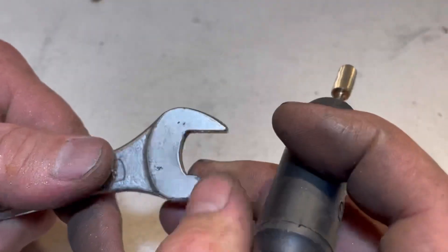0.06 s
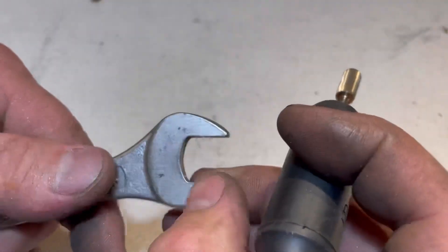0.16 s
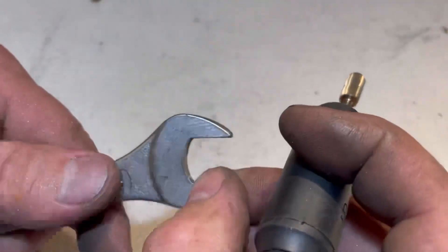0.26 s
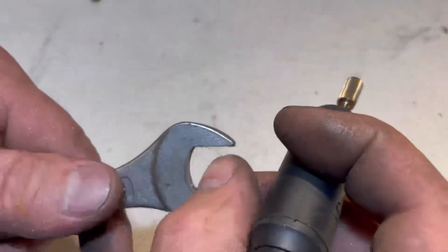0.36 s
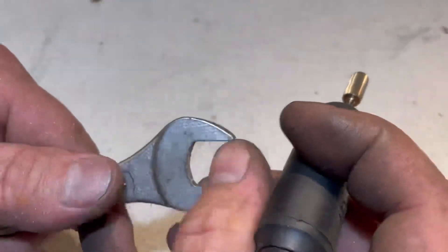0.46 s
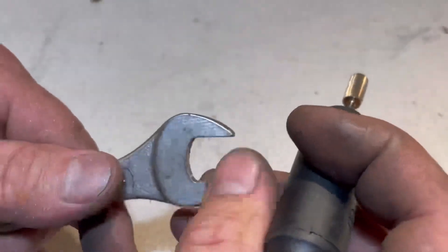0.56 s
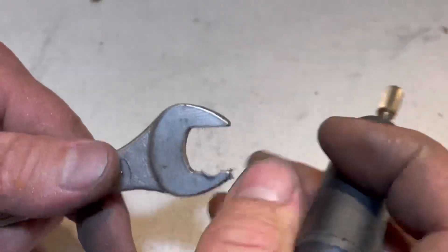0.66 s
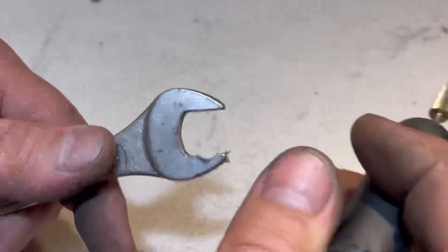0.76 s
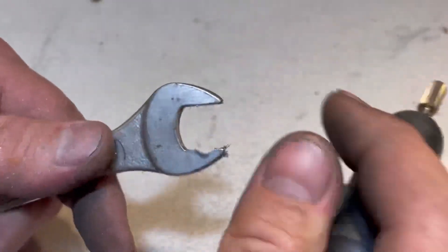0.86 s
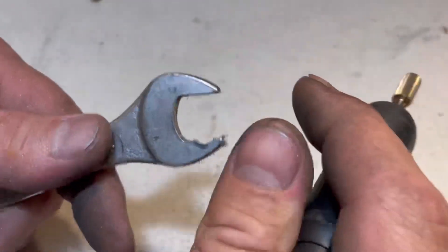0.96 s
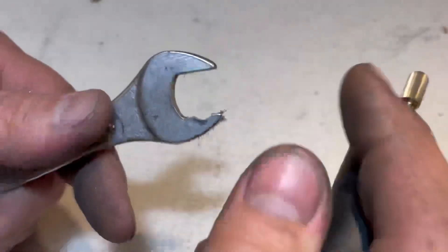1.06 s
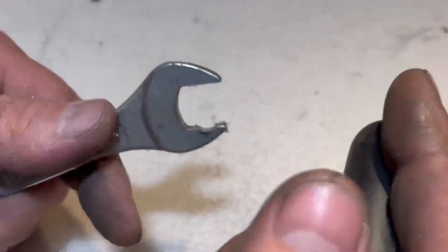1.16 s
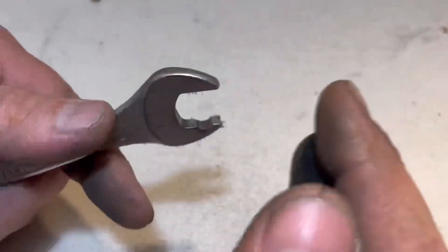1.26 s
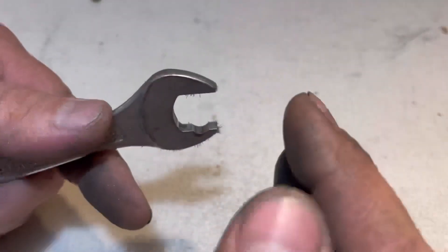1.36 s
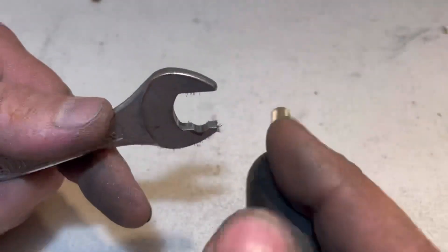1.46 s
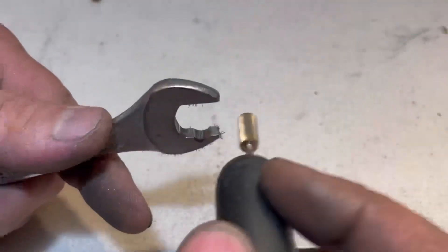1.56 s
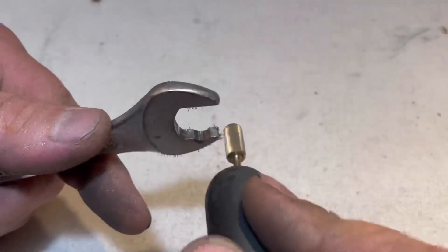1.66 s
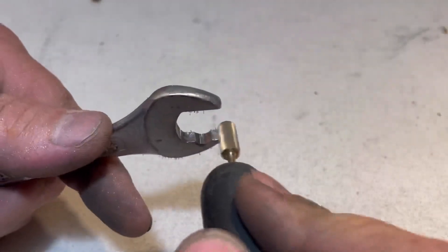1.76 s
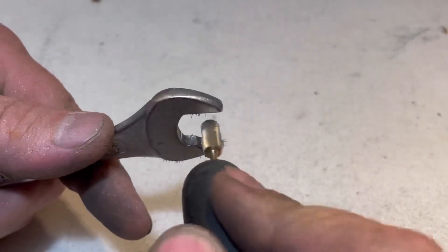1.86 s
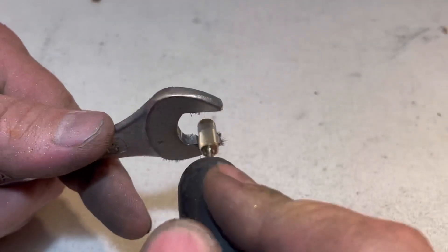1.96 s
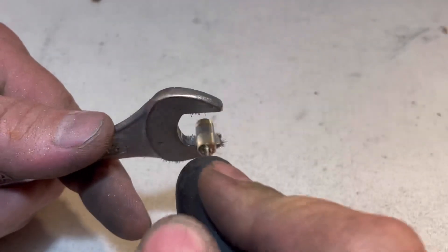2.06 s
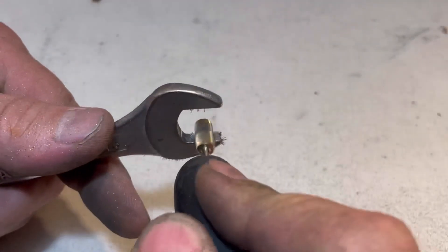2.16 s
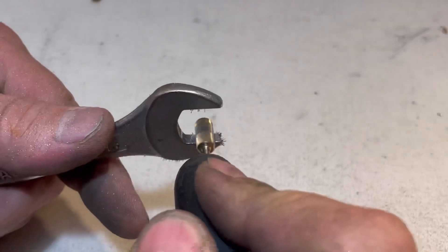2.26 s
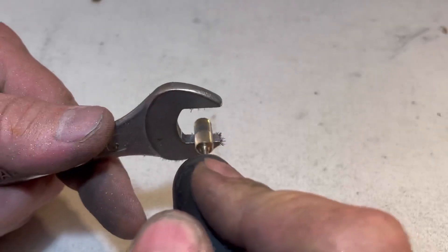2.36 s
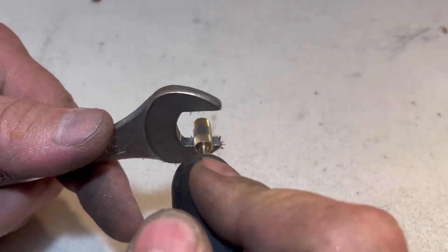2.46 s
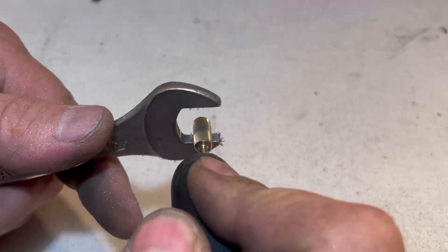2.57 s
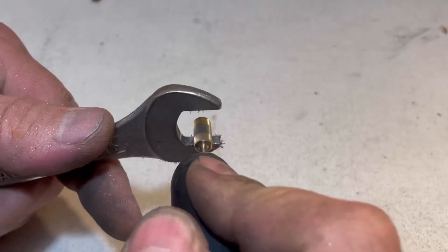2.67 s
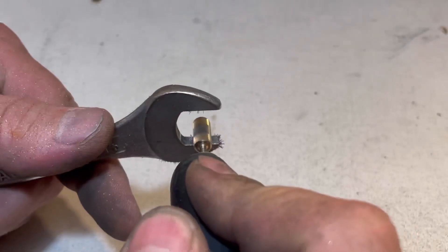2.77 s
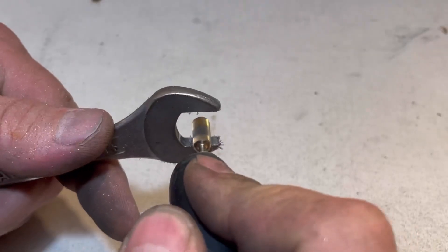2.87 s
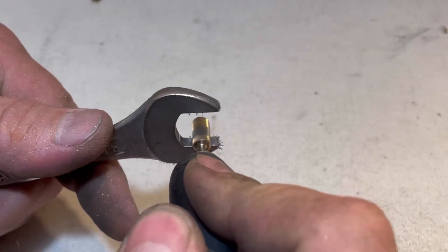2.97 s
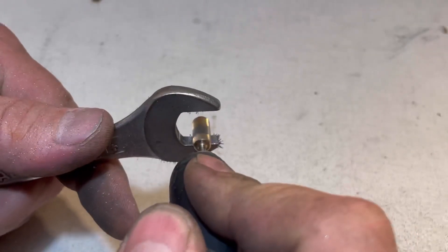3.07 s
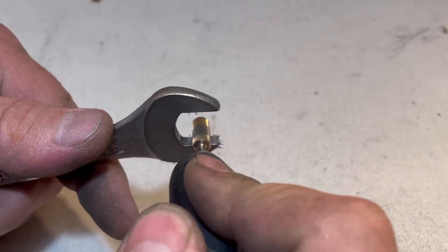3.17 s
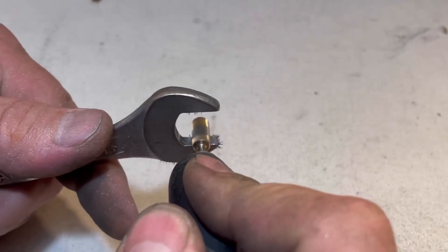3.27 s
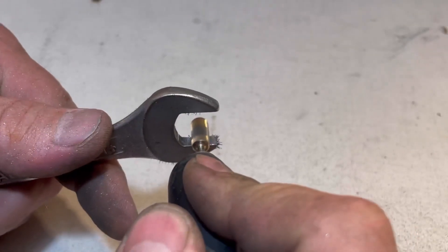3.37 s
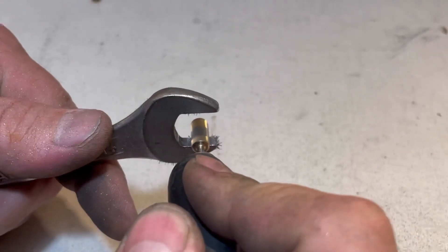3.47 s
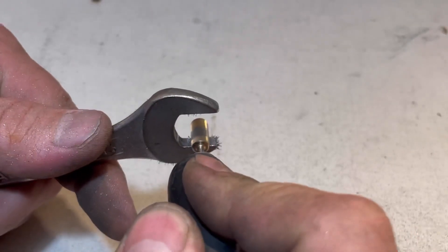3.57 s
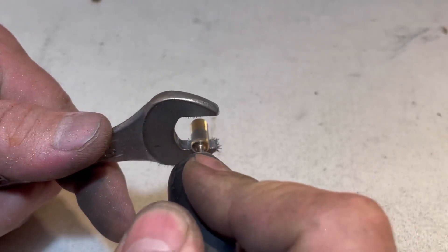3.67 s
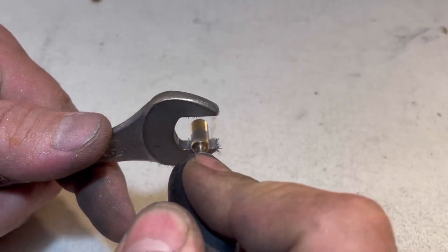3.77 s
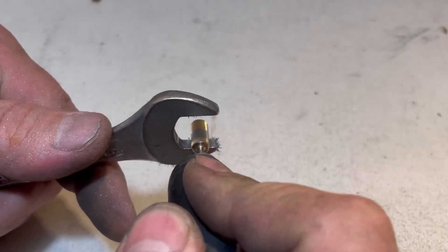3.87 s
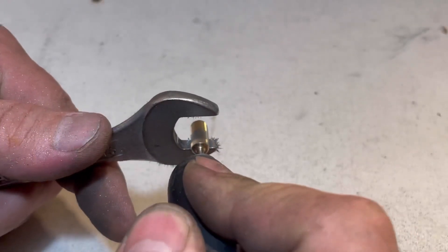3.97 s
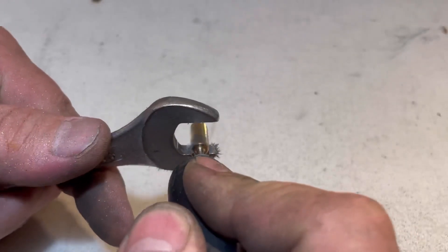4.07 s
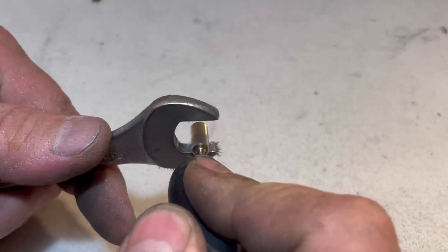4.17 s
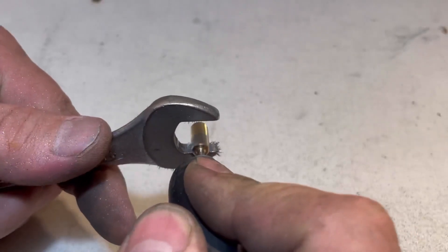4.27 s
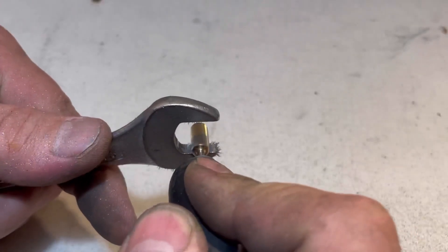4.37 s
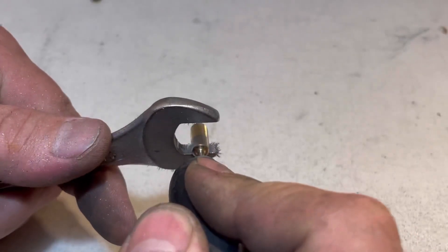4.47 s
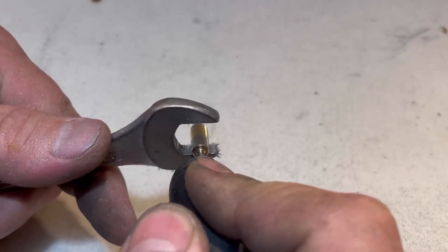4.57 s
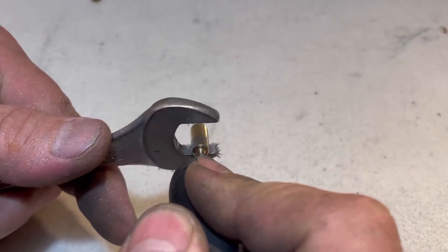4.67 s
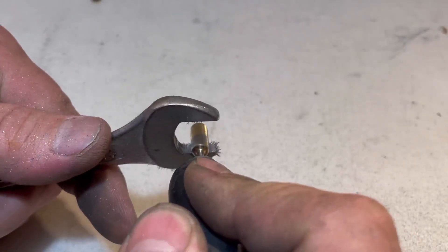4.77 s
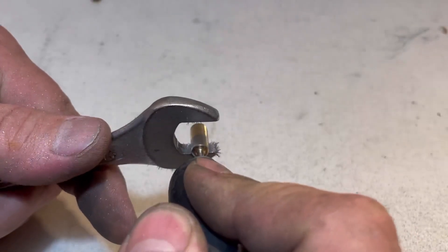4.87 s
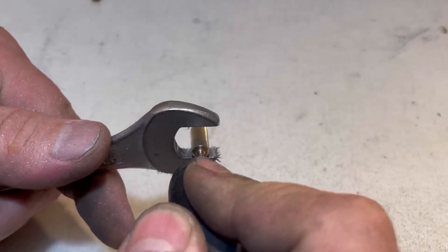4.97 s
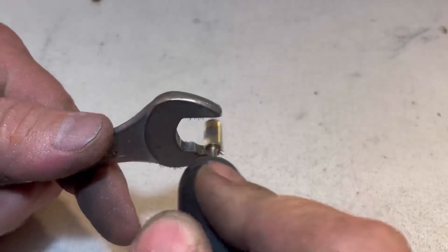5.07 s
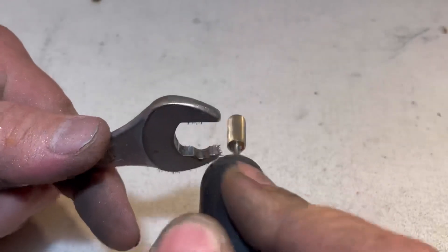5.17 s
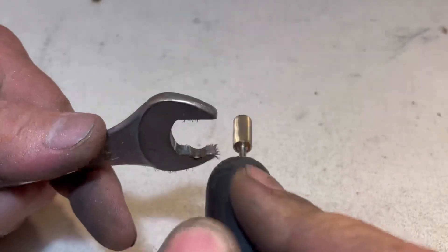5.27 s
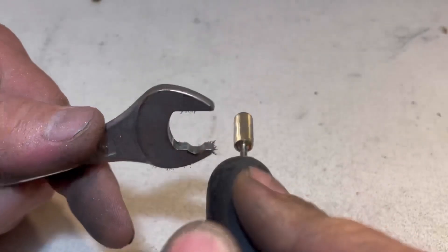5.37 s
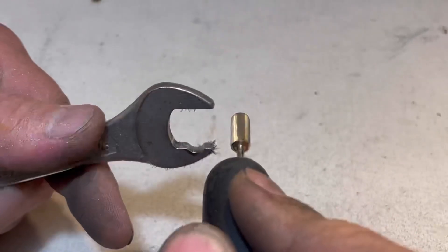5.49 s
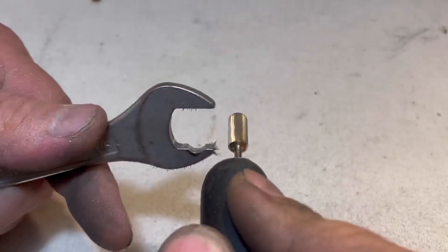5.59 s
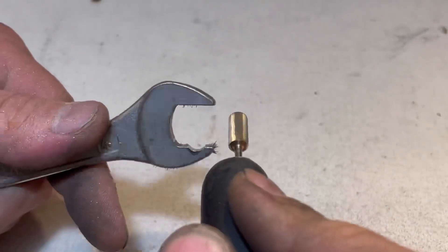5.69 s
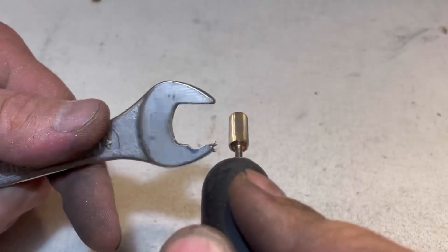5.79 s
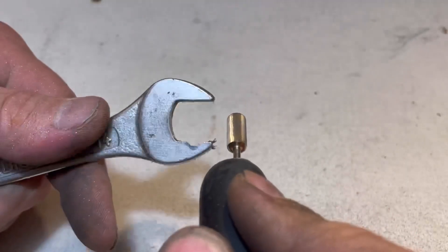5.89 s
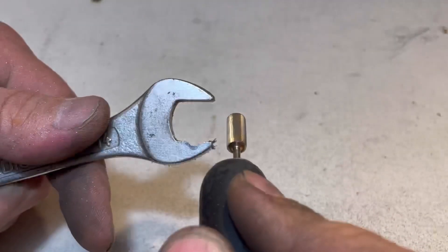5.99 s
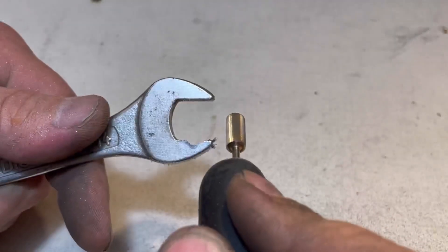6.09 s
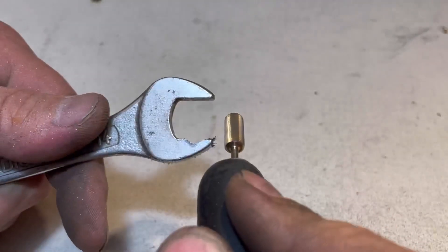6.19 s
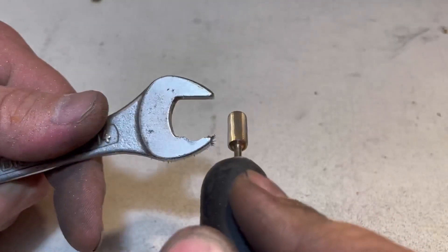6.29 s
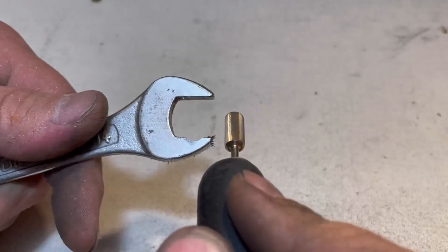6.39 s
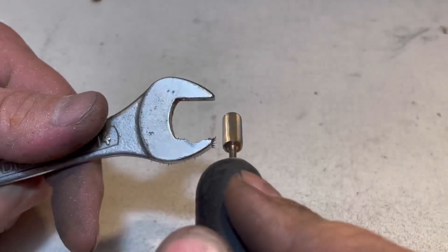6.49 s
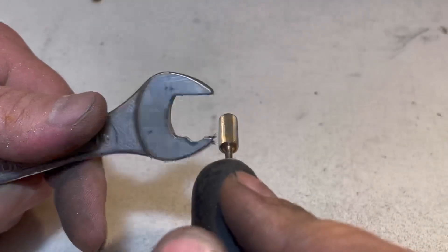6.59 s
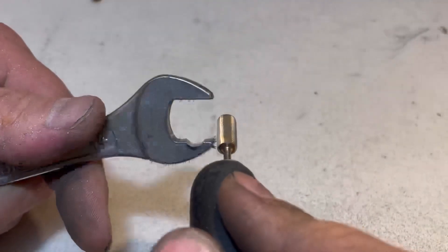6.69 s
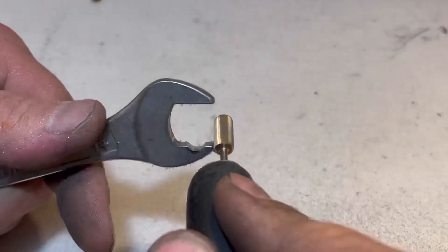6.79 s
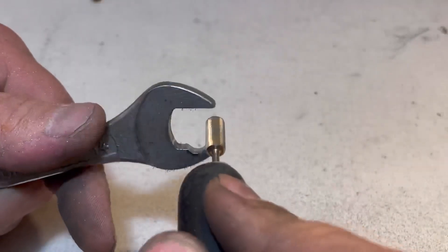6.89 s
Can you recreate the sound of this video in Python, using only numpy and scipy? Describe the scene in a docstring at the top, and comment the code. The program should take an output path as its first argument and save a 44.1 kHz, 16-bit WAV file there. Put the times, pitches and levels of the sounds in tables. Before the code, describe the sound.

A small handheld rotary tool runs with an airy, buzzing whirr and thin shifting whines. After about two seconds its burr bites a steel wrench jaw: a harsh, bright metallic rasp with high ringing, while the motor labours steadily down in pitch. At about five seconds the burr slips off, the grinding stops and the motor winds back up. Close, dry stereo pickup at a workshop bench.

```python
"""A small rotary tool whirrs and whines, then sags and rasps as its burr bites a steel wrench's jaw, which rings.
Let go, the motor climbs back to speed; moving hands shade the tool, so its tones swell and fade.
One shaft angle drives the motor: pulsed, filtered noise for the whirr, cosines for the hum and whines.
The bite drives resonances of wrench, jaw and shank with noise chips and a strike each turn.
Ticks, high pings and a low rumble join in; sparse reflections off bench and hands widen the stereo."""
import sys
import numpy as np
from scipy import signal
from scipy.fft import rfft, irfft
from scipy.io import wavfile
from scipy.ndimage import uniform_filter1d

SR = 44100
rng = np.random.default_rng(int(sys.argv[2]) if len(sys.argv) > 2 else 0)


def unload_wav(signal):
    """Save mono or channel-first audio to the path in sys.argv[1] as 16-bit WAV at rate SR, clipped to [-1, 1]."""
    wavfile.write(
        sys.argv[1],
        SR,
        np.round(np.clip(np.atleast_2d(signal).T, -1, 1) * 32767).astype(np.int16),
    )


N = 306054
TIME = np.arange(N) / SR
FREE_HZ = 368  # speed the released shaft closes in on, turns a second

# shaft speed until the burr lets go: t/s, f/Hz (turns a second)
SHAFT_SPEED = [(0.0, 375), (0.4, 374.2), (0.6, 374), (1.0, 376), (1.4, 372.8), (1.8, 369.2), (2.05, 369.9),
               (2.3, 363), (2.55, 350.5), (2.85, 322.1), (3.15, 292.6), (3.45, 272.4), (3.8, 252),
               (4.2, 239.8), (4.4, 234), (4.7, 227.8), (4.98, 220.6)]
# level of the running tool over time, with sudden steps near 1.4 and 5.6 s, before fixed trims:
# t/s, whirr level/dB, lower whirr level over it/dB, casing boom level over it/dB, once-a-turn hum level/dB
MOTOR_LEVELS = [(0.0, -39, -1, -11.5, -44), (0.35, -38, 0.5, -12.5, -44.5), (0.6, -34.5, 0.5, -10, -47),
                (0.9, -35.5, 4.5, -6.5, -44.5), (1.32, -34.5, 0, -9, -46), (1.4, -32.5, -1.5, -9, -35),
                (2.1, -34.5, -0.5, -5.5, -35), (2.35, -37, 10, -13, -33.5), (2.78, -31.5, 1, -8, -38.5),
                (2.9, -31, -3, -18, -41.5), (3.4, -33.5, -15, -13, -45.5), (3.9, -44, 0, -11, -50),
                (4.6, -38.5, -2.5, -16, -55), (4.93, -37, -4, -33, -55), (5.08, -44.5, 1, -5, -50.5),
                (5.52, -42.5, 2, -3.5, -44.5), (5.6, -39, 1.5, -3.5, -40), (6.3, -38.5, 0.5, -5.5, -38.5),
                (6.94, -37, -1, -7, -38)]
# the hand presses, eases or shades the tool for a moment:
# t/s, width/s, change of level/dB, extra jaw rasp/dB, extra wrench ring/dB
HAND_PUSHES = [(0.7, 0.059, -2.5, 0, 0), (0.95, 0.043, -2, 0, 0), (2.26, 0.032, 3, 4, -3),
               (2.85, 0.015, 0, 0, 2), (3.25, .02, -0.5, 4, 0), (3.6, 0.015, -0.5, 1, -5),
               (3.64, 0.012, 4, -4, -6), (3.8, 0.074, 4, 10.5, 0.5), (3.87, 0.034, -1.5, -12, -1.5),
               (3.95, 0.055, -0.5, 9.5, 7), (4.005, 0.036, -3.5, -7, -0.5), (4.07, 0.098, 4, 17, -6),
               (4.14, 0.028, -4, 5, 1), (4.2, 0.021, -1, 14, 2.5), (4.364, .004, 2, 0, -5),
               (4.39, .01, 0.5, -2, -3), (4.67, 0.04, 0.5, 13, 0.5), (4.74, 0.021, 0, -1, -10),
               (4.9, 0.012, -1.5, 0, -3), (4.965, 0.058, 2, 10, 5), (5.058, 0.019, 2, -5, 11)]
# ringing modes of the wrench: f/Hz, width/Hz, relative level/dB
WRENCH_MODES = [(10290, 50, 6), (9840, 760, 5.5), (11000, 490, -25), (7900, 150, -14)]


def shaft(unsteady=0.00053):
    """Running angle in turns: the integral of a slightly trembling speed."""
    hz = speed() * (1 + unsteady * wander(25, count=1)[0])
    return np.cumsum(hz) / SR


def speed(recover_s=.46):
    """Shaft turns a second: the curve under load, then an exponential climb to free speed."""
    end_s, end_hz = SHAFT_SPEED[-1]
    climb = FREE_HZ - (FREE_HZ - end_hz) * np.exp(-np.maximum(TIME - end_s, 0) / recover_s)
    return np.where(TIME < end_s, curves(SHAFT_SPEED)[0], climb)


def whirr(turns, swell_db=2.5, orders_db=-14, casing_hz=2622, casing_width_hz=730):
    """Fan air and brush noise throb once a turn and boom in the casing; high shaft orders swell within."""
    # upper air noise: f/Hz, relative level/dB
    high_colour = [(3300, -23.5), (4700, -10), (6000, -4), (8500, -2), (10000, -3), (11500, 2.5),
                   (12700, -1.5), (13400, -5.5), (14200, -16), (15600, -12)]
    # lower air noise: f/Hz, relative level/dB
    low_colour = [(100, -58), (250, -22.5), (520, -25.5), (1000, -9), (1900, -10.5), (3300, -8), (4700, -6),
                  (6500, -15.5)]
    # once-a-turn throb: t/s, depth/0-1
    throb = [(0, .15), (1.3, .2), (1.45, .6), (2.15, .6), (2.6, .35), (5.1, .35), (5.7, .4), (6.3, .55)]

    level_db, low_db, casing_db, _ = curves(MOTOR_LEVELS)
    level_db = level_db + bumps(HAND_PUSHES)[0]
    pulse = 1 + curves(throb)[0] * np.cos(2 * np.pi * turns)
    high_air, low_air, casing_air = pulse * rng.standard_normal((3, N))

    air = coloured(high_air, high_colour)
    air += amp(low_db - 5.5) * coloured(low_air, low_colour)
    # the casing noise passes a broad peak, then the casing resonance
    broad_peak = evened(signal.lfilter(*signal.iirpeak(casing_hz, 2.5, SR), casing_air))
    air += amp(casing_db) * rung(broad_peak, [(casing_hz, casing_width_hz, 0)])

    orders = sum(amp(swell_db * swell) * np.cos(2 * np.pi * ((k + 8) * turns + rng.random()))
                 for k, swell in enumerate(wander(2.5, count=30)))
    return amp(level_db + 3.0) * (patchy(air, patch_db=1.98) + amp(orders_db) * evened(orders))


def hum(turns, phases, waver_db=.9, swell_db=2., grip_db=1.2, steady_db=-40):
    """Seven clean low orders of the unbalanced rotor, overtones swelling as they pass housing resonances."""
    # housing response to the overtones: f/Hz, level over the whirr table/dB
    housing = [(450, -28), (750, -29), (1100, -28), (1500, -29), (2600, -27)]
    # the once-a-turn hum dips or swells briefly: t/s, width/s, change of level/dB
    hum_dips = [(0.07, 0.021, -4), (0.53, .04, -3.5), (0.71, 0.055, -7.5), (0.98, 0.01, 5.5),
                (1.09, 0.041, 5.5), (2.89, 0.049, -4.5), (3.28, 0.027, -10), (3.41, 0.05, 6),
                (3.58, 0.053, -2.5), (3.75, .05, 4), (5.09, .03, 4.5)]

    whirr_db, *_, beat_db = curves(MOTOR_LEVELS)
    beat_db = beat_db + bumps(hum_dips)[0]
    faintness = np.clip((steady_db - beat_db) / 6, 0, 1)
    beat_db = beat_db + grip_db * faintness * wander(14, count=1)[0]  # a faint hum wavers more

    levels = [beat_db]
    for k, swell in enumerate(wander(4.5, count=6)):
        housing_db = read((k + 2) * speed(), *np.transpose(housing))
        levels.append(whirr_db + housing_db + swell_db * swell)

    out = np.zeros(N)
    for k, (db, waver) in enumerate(zip(levels, wander(18, count=7))):
        gain = amp(db + waver_db * np.sqrt(k) * waver)  # higher orders waver more
        out += np.sqrt(2) * gain * np.cos(2 * np.pi * ((k + 1) * turns + phases[k + 1]))
    return out


def whines(turns, phases, fade_s=0.1, flutter_db=2.8, loaded_db=5, rough_order=9, loaded_orders=12,
           top_db=3.5, slip_turns=.07):
    """Shaft orders fade in, flutter and fade out as the hands uncover them; low orders hold steadier."""
    # orders that stand out for a while: from t/s, to t/s, shaft order, level/dB
    stretches = [(0.7, 1.1, 2, -59), (1.1, 2.1, 2, -53), (2.4, 2.9, 2, -47), (3.85, 4.35, 2, -59),
                 (5.45, 5.8, 2, -64), (6.15, 7, 2, -63), (0, 0.5, 3, -57), (0.58, 1.2, 3, -47),
                 (1.2, 2.25, 3, -43.5), (2.63, 2.9, 3, -41.5), (2.9, 3.1, 3, -45), (3.1, 3.55, 3, -51),
                 (3.55, 4.1, 3, -60), (4.1, 5.0, 3, -65), (5.0, 5.25, 3, -60), (5.25, 5.5, 3, -65),
                 (5.5, 6.1, 3, -51), (6.1, 7, 3, -58), (0, 0.55, 4, -55), (0.62, 0.95, 4, -48),
                 (0.9, 1.3, 4, -53), (1.5, 2.1, 4, -52), (2.15, 2.4, 4, -45), (2.58, 2.83, 4, -46),
                 (2.85, 3.08, 4, -39), (3.08, 3.25, 4, -49), (3.65, 3.95, 4, -57), (3.95, 4.45, 4, -52),
                 (4.45, 4.95, 4, -61), (5.2, 6.0, 4, -54), (5.52, 5.72, 4, -53), (6.25, 7, 4, -59),
                 (0.45, 0.75, 5, -52), (0.95, 1.55, 5, -48), (1.62, 1.8, 5, -45), (2.08, 2.28, 5, -47),
                 (2.7, 3.0, 5, -51), (3.28, 3.62, 5, -46), (3.6, 4.6, 5, -52), (4.6, 4.95, 5, -59),
                 (5.05, 5.4, 5, -58), (5.4, 5.72, 5, -51), (5.72, 6.2, 5, -55), (6.6, 7, 5, -54),
                 (0, 0.4, 6, -57), (0.4, 0.62, 6, -48), (0.7, 0.95, 6, -49), (0.95, 1.4, 6, -53),
                 (1.5, 2.25, 6, -42), (3.1, 5.0, 6, -61), (5.08, 5.22, 6, -54), (5.65, 6.3, 6, -51),
                 (6.3, 7, 6, -56), (0.4, 0.62, 7, -47), (0.6, 1.35, 7, -51), (1.5, 1.8, 7, -45),
                 (2.1, 2.35, 7, -47), (2.35, 2.7, 7, -43), (2.85, 3.0, 7, -44), (3.0, 3.3, 7, -52),
                 (3.6, 3.9, 7, -58), (5.82, 6.65, 7, -43), (6.65, 7, 7, -41.5), (0.45, 0.62, 8, -48),
                 (0.8, 1.18, 8, -49), (0, 0.4, 8, -59), (1.4, 1.62, 8, -41), (1.8, 2.1, 8, -50),
                 (2.25, 2.6, 8, -48), (2.75, 3.03, 8, -42), (3.25, 3.9, 8, -54), (5.2, 5.5, 8, -47),
                 (5.5, 5.82, 8, -42), (5.82, 6.3, 8, -50), (0.56, 0.69, 9, -43), (0.8, 1.1, 9, -53),
                 (1.4, 2.3, 9, -51), (2.6, 2.8, 9, -44), (2.82, 3.05, 9, -41), (3.2, 3.48, 9, -48),
                 (5.1, 5.8, 9, -47), (5.8, 6.75, 9, -56), (0.75, 1.2, 10, -53), (1.45, 2.0, 10, -47),
                 (0, 0.2, 10, -54), (2.8, 3.15, 10, -42), (3.15, 3.6, 10, -41), (3.7, 3.85, 10, -47),
                 (4.04, 4.14, 10, -45), (5.05, 6.2, 10, -53), (1.6, 2.0, 11, -50), (3.0, 3.3, 11, -41),
                 (3.4, 3.7, 11, -45), (3.7, 4.15, 11, -42), (0.6, 1.0, 12, -54), (1.4, 2.2, 12, -49),
                 (2.4, 3.2, 12, -46), (3.2, 3.68, 12, -46), (3.68, 3.86, 12, -43), (6.0, 6.2, 12, -52),
                 (6.55, 7, 12, -54), (1.4, 2.2, 13, -53), (3.6, 4.8, 13, -49), (6.0, 6.75, 13, -57),
                 (6.75, 7, 13, -51), (1.4, 1.8, 14, -49), (1.8, 2.2, 14, -46.5), (4.14, 4.95, 14, -47),
                 (5.4, 6.75, 14, -56), (6.75, 7, 14, -49), (1.5, 2.2, 15, -50), (3.2, 4.95, 15, -50),
                 (5.4, 5.6, 15, -55), (6.75, 7, 15, -49), (0, 1.2, 16, -56), (1.38, 1.8, 16, -46),
                 (2.4, 3.4, 16, -48), (4.2, 4.7, 16, -50), (4.72, 4.85, 17, -46), (5.17, 5.45, 16, -54),
                 (5.45, 5.78, 16, -58), (5.78, 6.2, 16, -50), (6.75, 7, 16, -47), (1.35, 1.8, 17, -42),
                 (1.8, 2.0, 17, -46), (0, 1.2, 17, -57), (2.0, 2.4, 17, -53), (3.6, 4.4, 17, -50),
                 (5.95, 6.4, 17, -54), (6.76, 7, 17, -47), (0, 0.8, 18, -57), (4.0, 4.5, 18, -48),
                 (6.0, 6.3, 18, -58), (6.76, 7, 18, -48), (1.2, 1.8, 19, -55), (6.76, 7, 19, -53),
                 (0.3, 1.3, 32, -50), (1.38, 2.4, 32, -46), (5.6, 6.2, 32, -52), (6.33, 7, 32, -47)]
    # the burr skips and the whines dip for an instant: t/s, width/s, change of level/dB
    skips = [(2.6, .012, -8), (2.775, .01, -10), (2.84, .009, -16), (2.885, .005, -6), (3.09, .01, -6)]

    # share of speed lost: a labouring shaft breaks the tones up and bends them
    load = (1 - speed() / FREE_HZ) * (TIME < SHAFT_SPEED[-1][0])
    chance = np.array(wander(55, count=8)) + np.array(wander(13, count=8))
    flutters = np.minimum((flutter_db + loaded_db * load) * chance / np.sqrt(2), top_db)
    slips = slip_turns * load * np.array(wander(30, count=8))

    out = np.zeros(N)
    for k, (start, end, order, db) in enumerate(stretches):
        span = slice(max(round((start - fade_s / 2) * SR), 0), round((end + fade_s / 2) * SR))
        fade = np.clip(np.minimum(TIME[span] - start, end - TIME[span]) / fade_s + .5, 0, 1)
        rough = np.minimum((order + loaded_orders * load[span]) / rough_order, 1) ** 2
        gain = amp(db + rough * flutters[k % len(flutters)][span])
        angle = round(order) * (turns[span] + slips[k % len(slips)][span]) + phases[round(order)]
        out[span] += fade * gain * np.cos(2 * np.pi * angle)
    return np.sqrt(2) * out * amp(bumps(skips)[0])


def grind(turns, chatter_db=0.5, edge_s=0.046, knock_turns=0.017, knock_share=.3, bite=0.5, uneven_db=1.2,
          jaw_base_hz=2666, jaw_rise_hz=1290, jaw_width_hz=680, lift_s=4.94, lift_fall_hz_per_s=5600):
    """The off-centre burr bites harder once a turn, unevenly; chips excite wrench, jaw and shank."""
    # burr on steel, before fixed trims: t/s, cutting level/dB, then over it:
    # wrench ring level/dB, jaw rasp level/dB, shank mode level/dB
    cut = [(2.1, -32, -12, 4, 0), (2.22, -50.5, 11, 10.5, 8), (2.38, -43, 10.5, 9, 20),
           (2.48, -33.5, -1, 8, 18), (2.6, -31.5, 0, -2, 8.5), (2.82, -28.5, -1.5, 0, 10.5),
           (2.95, -26, -6, 2.5, 6), (3.07, -29, -2, 1.5, 8.5), (3.16, -28.5, -2, -5, -8),
           (3.55, -34, 3.5, -1, -11), (3.8, -37, 4, -10, 2.5), (4.3, -36.5, 7, -15, 8),
           (4.65, -34, 4, -12, 1), (4.88, -37.5, 8.5, -18, 11), (4.961, -35.5, -15, -1.5, -7),
           (5.031, -43, -11, 1, 12), (5.06, -57, -14, 1, 6), (5.1, -58, -9, 5, -6)]
    # noise of the chips: f/Hz, relative level/dB
    chip_colour = [(500, -80), (1000, -16.5), (1900, -26), (2270, -32), (2480, -9.5), (4300, -2.5),
                   (5700, -13.5), (6900, -1.5), (7800, -7.5), (9000, -21), (10200, 5.5), (11300, -33),
                   (12500, -28), (13600, -27), (15500, -17)]
    # shank modes: f/Hz, width/Hz, relative level/dB
    shank_modes = [(4160, 2200, -5.5), (4300, 210, -9)]

    push_db, jaw_more_db, ring_more_db = bumps(HAND_PUSHES)
    cut_db, ring_db, jaw_db, shank_db = curves(cut)
    cut_db, ring_db, jaw_db = cut_db + push_db, ring_db + ring_more_db, jaw_db + jaw_more_db
    start_s, end_s = cut[0][0], cut[-1][0]

    # the rasp climbs with the share of speed lost, then drops as the burr slides off the jaw
    jaw_hz = jaw_base_hz + jaw_rise_hz * (1 - speed() / FREE_HZ) + 90 * wander(12, count=1)[0]
    jaw_hz -= lift_fall_hz_per_s * np.clip(TIME - lift_s, 0, end_s - lift_s)

    per_turn = amp(uneven_db * rng.standard_normal(int(turns[-1]) + 2))[turns.astype(int)]
    bite_shape = 1 - bite + bite * np.exp(-(turns % 1) / 0.9)
    force = bite_shape * per_turn * amp(chatter_db * wander(40, count=1)[0])
    chips = force * rng.standard_normal((4, N))
    # the high spot strikes at the same place each turn; the wrench ring gets no strike
    knocks = evened(per_turn * np.exp(-(turns % 1) / knock_turns))
    chips[[0, 2, 3]] = evened(chips[[0, 2, 3]]) + knock_share * knocks

    out = amp(4.5) * coloured(chips[0], chip_colour)
    out += amp(ring_db + 8.0) * rung(chips[1], WRENCH_MODES)
    out += amp(jaw_db - 3.0) * gliding(chips[2], jaw_hz, jaw_width_hz)
    out += amp(shank_db - 11.5) * rung(chips[3], shank_modes)
    touch = np.clip(np.minimum(TIME - start_s, end_s - TIME) / edge_s, 0, 1)
    return touch * amp(cut_db) * out


def squeal(hz=4220, ring_width_hz=50):
    """A narrow shank resonance driven by noise, swelling once."""
    # the shank sings at first touch: t/s, width/s, level/dB
    song = [(2.265, .06, -36)]
    (s, width_s, db), = song
    swell = bumps([(s, width_s, 1)])[0]
    return amp(db) * swell * rung(rng.standard_normal(N), [(hz, ring_width_hz, 0)])


def pings(edge_s=.002):
    """Short clean high sine bursts near 10.3 kHz, at the frequency of the first wrench mode."""
    # t/s, length/s, level/dB
    bursts = [(4.3685, .008, -13), (4.385, .012, -22), (5.052, .016, -29)]
    s, length_s, db = np.transpose(bursts)[:, :, None]
    shape = np.clip(np.minimum(TIME - s, s + length_s - TIME) / edge_s + .5, 0, 1)
    envelope = (amp(db) * shape).sum(axis=0)
    return np.sqrt(2) * envelope * np.sin(2 * np.pi * WRENCH_MODES[0][0] * TIME)


def ticks(width_s=.0004):
    """Small dry ticks: a few cycles of sine under a very short bell envelope."""
    # t/s, f/Hz, level/dB
    tick_rows = [(.396, 6000, -28), (.3985, 3200, -24)]
    out = np.zeros(N)
    t = np.arange(-100, 100) / SR
    for s, hz, db in tick_rows:
        tick = np.exp(-(t / width_s) ** 2) * np.sin(2 * np.pi * hz * t)
        out[round(s * SR) - 100:][:200] += amp(db) * tick
    return out


def rumble(sink_s=2.2, base_db=-52.5, grinding_db=-5.5):
    """Low noise under everything, sinking once the burr is in and swelling briefly."""
    # f/Hz, relative level/dB
    rumble_colour = [(25, -40), (40, -21), (60, -8.5), (100, -4), (200, -8.5), (350, -1.5), (600, -14.5)]
    # brief swells: t/s, width/s, change of level/dB
    thuds = [(1.72, .06, 0), (0.1, 0.31, 0), (2.25, 0.15, 11), (2.38, 0.073, 4), (2.6, 0.25, 13),
             (4.29, 0.037, 6), (5.07, .03, 10), (5.8, .05, 3)]
    level_db = base_db + grinding_db * (TIME > sink_s) + bumps(thuds)[0]
    return amp(level_db) * coloured(rng.standard_normal(N), rumble_colour)


def bench(x, t60=0.05, drift_hz=3.):
    """Scattered sound off bench and hands: three short tails of sparse taps, swapped as the hands move."""
    out = np.zeros(N)
    for k in range(3):
        taps = np.zeros(4000)
        taps[np.arange(40, 3980, 20) + rng.integers(0, 20, 197)] = rng.choice([-1., 1.], 197)
        taps *= amp(-60 * np.arange(4000) / SR / t60)
        share = np.sqrt(2 / 3) * np.cos(np.pi * (drift_hz * TIME + k / 3))
        out += signal.fftconvolve(x * share, taps / np.linalg.norm(taps))[:N]
    return out


def amp(db):
    """Decibels to gain."""
    return 10 ** (np.asarray(db) / 20)


def evened(x):
    """Scales to rms 1."""
    return x / np.sqrt(np.mean(x ** 2) + 1e-20)


def curves(rows):
    """Columns of a time table, one value a sample."""
    s, *columns = np.transpose(rows)
    return [np.interp(TIME, s, c) for c in columns]


def bumps(rows):
    """Bell-shaped swells of (t/s, width/s, heights ..) rows, summed, one curve a height."""
    s, width_s, *heights = np.transpose(rows)
    return np.array(heights) @ np.exp(-((TIME - s[:, None]) / width_s[:, None]) ** 2)


def wander(rate_hz, count):
    """Slow random curves of rms about 1, drawn through rate_hz random knots a second."""
    knots = rng.standard_normal((count, 400))
    return [np.interp(TIME * rate_hz, np.arange(400), k) * np.sqrt(1.5) for k in knots]


def read(hz, at_hz, value):
    """Reads a spectrum table on a log frequency axis."""
    return np.interp(np.log(hz + 1), np.log(at_hz + 1), value)


def coloured(x, spectrum):
    """Filters x by a (f/Hz, level/dB) spectrum, then evens it."""
    gain = amp(read(np.fft.rfftfreq(N, 1 / SR), *np.transpose(spectrum)))
    return evened(irfft(rfft(x) * gain, N))


def rung(x, modes):
    """Drives a set of (f/Hz, width/Hz, level/dB) resonances, then evens their sum."""
    return evened(sum(amp(db) * evened(signal.lfilter(*signal.iirpeak(hz, hz / width_hz, SR), x))
                      for hz, width_hz, db in modes))


def gliding(x, hz, width_hz):
    """A resonance that follows the curve hz: shift down, smooth twice, shift back."""
    carrier = np.exp(2j * np.pi * np.cumsum(hz) / SR)
    r = np.exp(-np.pi * width_hz / SR)
    smooth = signal.lfilter([1], np.convolve([1, -r], [1, -r]), x / carrier)
    return evened((carrier * smooth).real)


def patchy(x, patch_db):
    """Random patches of tone colour, a few hundred Hz by a few dozen ms."""
    z = signal.stft(x, nperseg=512, noverlap=384)[2]
    patches = uniform_filter1d(rng.standard_normal(z.shape), size=4, axis=0)
    patches = uniform_filter1d(patches, size=14, axis=1)
    # the second term makes up for the mean power the random gains add
    gain_db = patch_db * evened(patches) - patch_db ** 2 * np.log(10) / 20
    return signal.istft(z * amp(gain_db), nperseg=512, noverlap=384)[1][:N]


def scene():
    """Direct sound of tool, wrench and rumble, and its scattered share."""
    turns, phases = shaft(), rng.random(size=40)  # each order of hum and whines keeps its phase
    direct = whirr(turns) + hum(turns, phases) + whines(turns, phases)
    direct += patchy(grind(turns), patch_db=1.1)
    direct += squeal() + pings() + ticks() + rumble()
    return np.array([direct, bench(direct)])


def record(dry, edge_hz=15780):
    """Left and right with chosen likeness, balance and phase by frequency; then bass cut and low-pass."""
    # likeness and balance of the channels: f/Hz, likeness/0-1, left over right level/dB
    stereo = [(80, .9, .5), (350, .99, -.6), (560, .65, 3), (700, .75, 5), (900, .68, 1.5), (1130, .75, 7),
              (1500, .9, 3), (1850, .99, .6), (2400, .99, .6), (3200, .92, .9), (5300, .95, 0),
              (5750, .7, 0), (7300, .78, .4), (8000, 1, 0), (9250, 1, 0), (9700, .9, 0), (11500, .73, 0),
              (12200, .8, 0), (12800, 1, 0)]
    # phase of right ahead of left, nearly opposite around 8-9 kHz: f/Hz, phase/rad
    phase_lead = [(80, 0), (430, -.5), (620, .2), (1080, -.8), (1650, 0), (2400, 0), (4300, -.45),
                  (5350, 0), (5800, 1.3), (6800, .8), (7100, 1.1), (7750, np.pi), (9350, np.pi),
                  (9900, 4.05), (11200, 4.8), (12250, 5.6), (12700, 2 * np.pi)]

    hz = np.fft.rfftfreq(N, 1 / SR)
    at_hz, like, balance_db = np.transpose(stereo)
    like = np.clip(read(hz, at_hz, like), 0, 1)
    # the scattered sound enters left and right with opposite sign
    direct, scattered = rfft(dry) * np.sqrt([1 + like, 1 - like]) / np.sqrt(2)
    # half the level and phase difference goes to each side
    apart = amp(read(hz, at_hz, balance_db) / 2) * np.exp(-.5j * read(hz, *np.transpose(phase_lead)))
    bass_cut = 1 / np.sqrt(1 + (45 / (hz + 1)) ** 6)
    channels = irfft(bass_cut * [(direct + scattered) * apart, (direct - scattered) / apart], N)
    low_pass = signal.firwin(1023, edge_hz, window=("kaiser", 9), fs=SR)
    return signal.oaconvolve(channels, low_pass[None], "same")


dry = scene()
out = record(dry)
unload_wav(out)
```